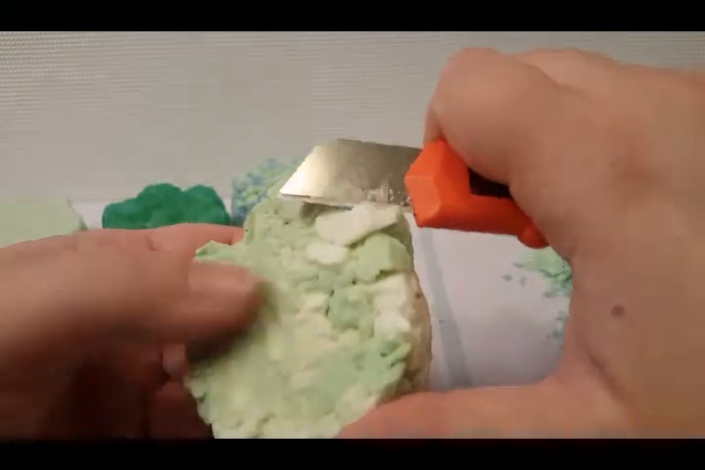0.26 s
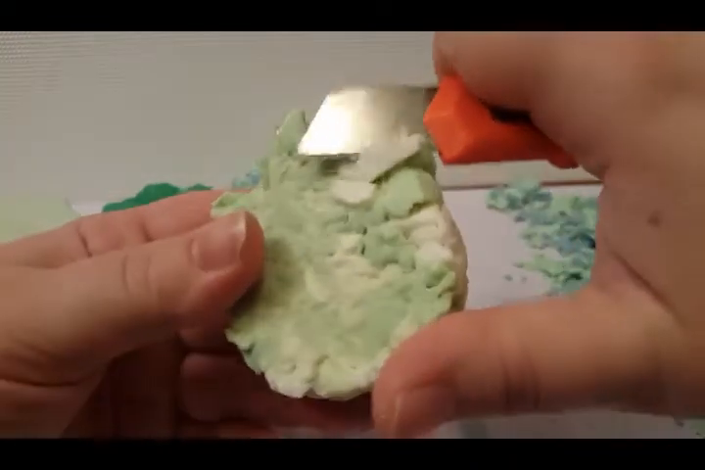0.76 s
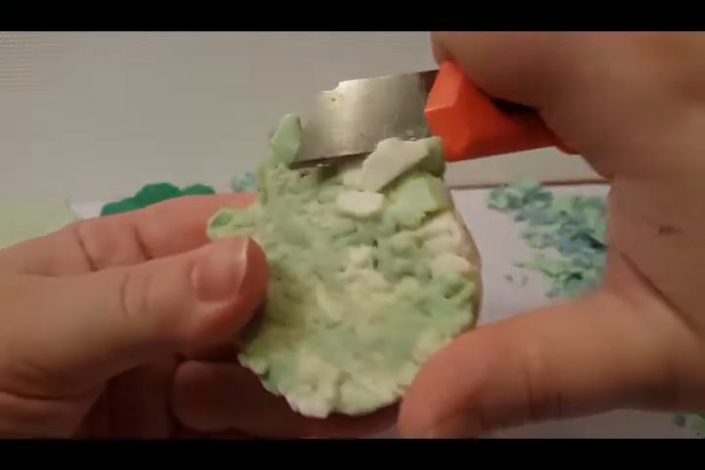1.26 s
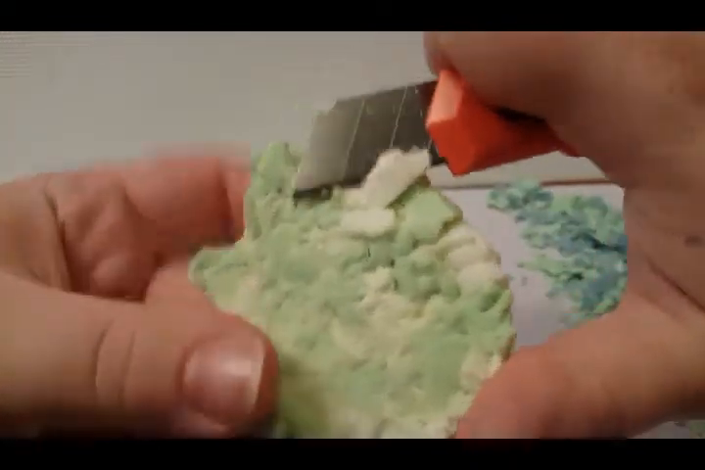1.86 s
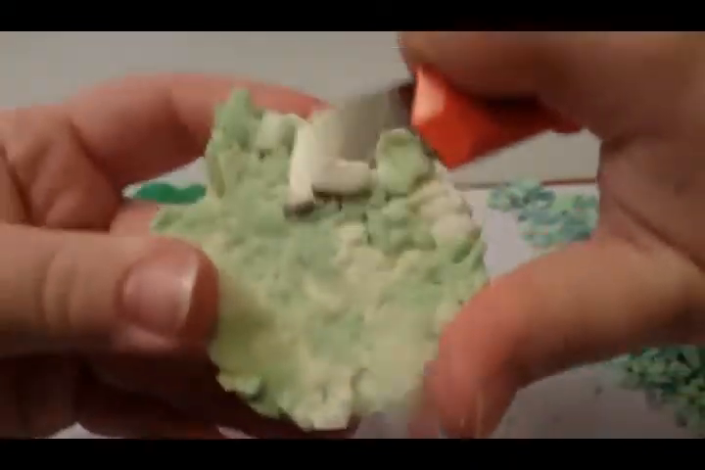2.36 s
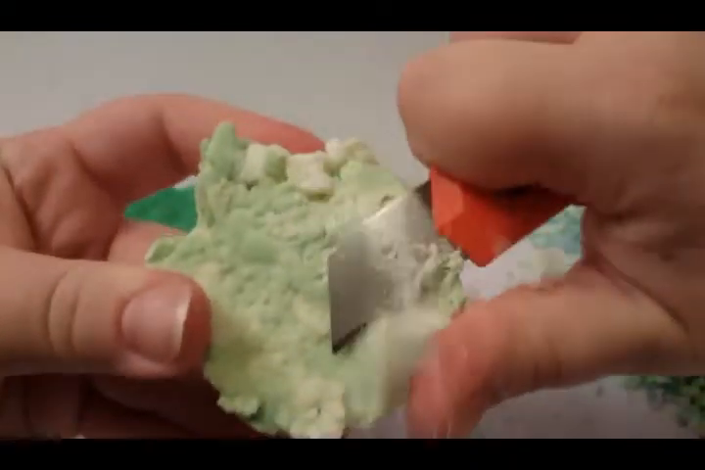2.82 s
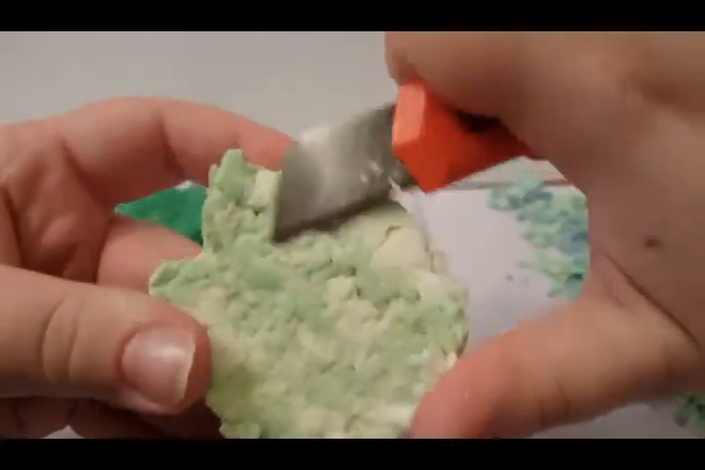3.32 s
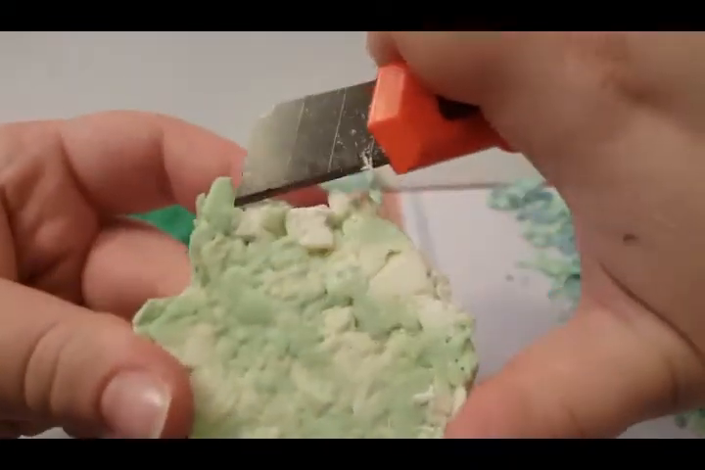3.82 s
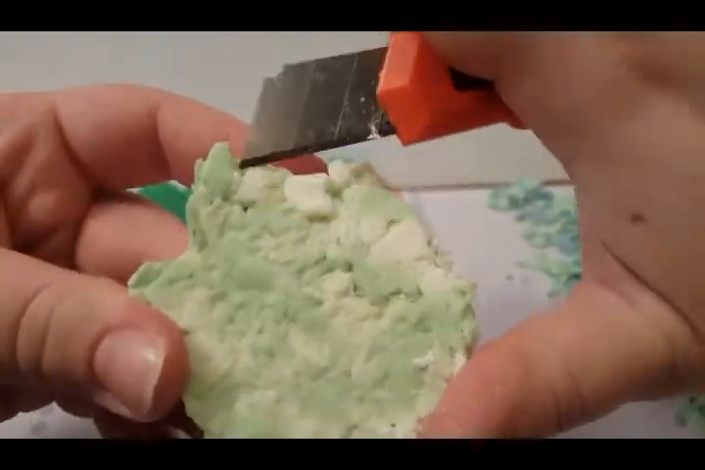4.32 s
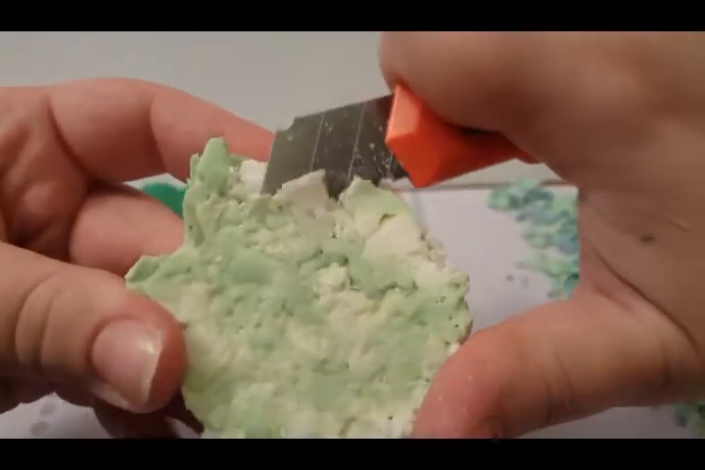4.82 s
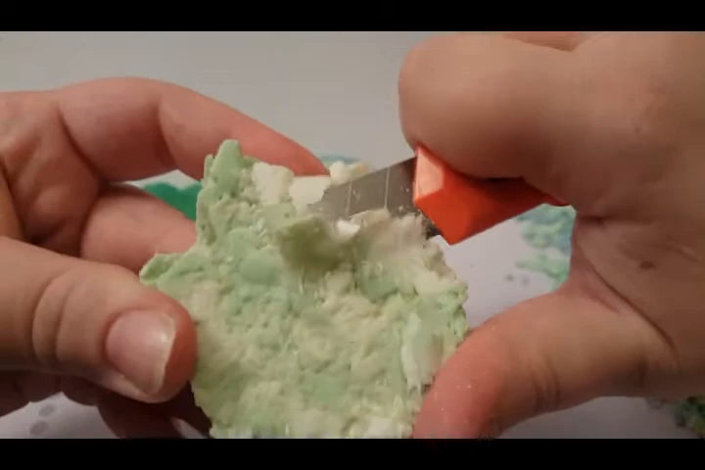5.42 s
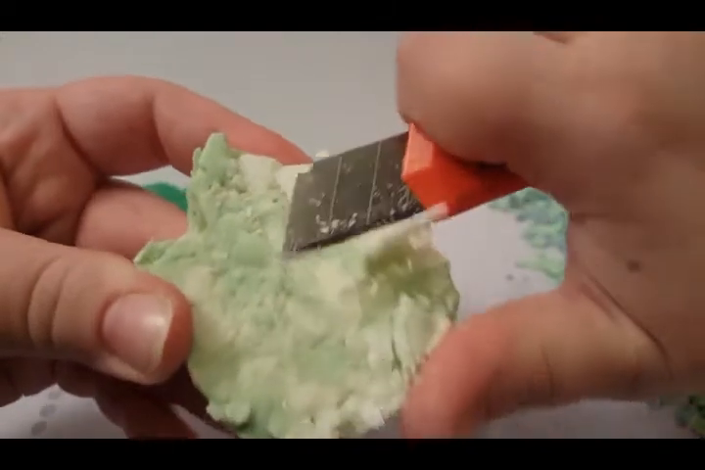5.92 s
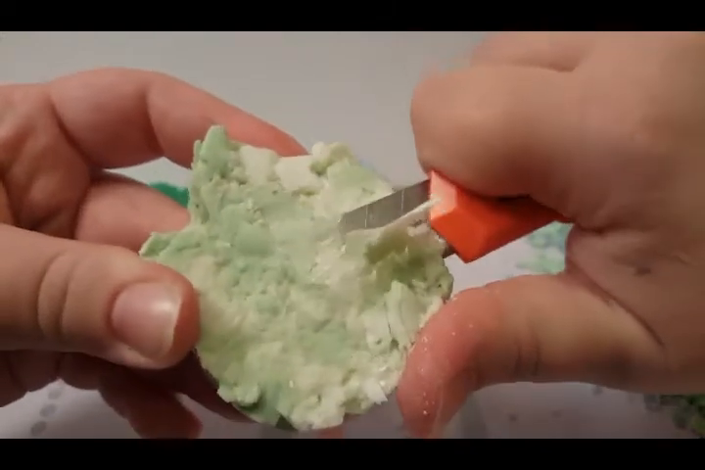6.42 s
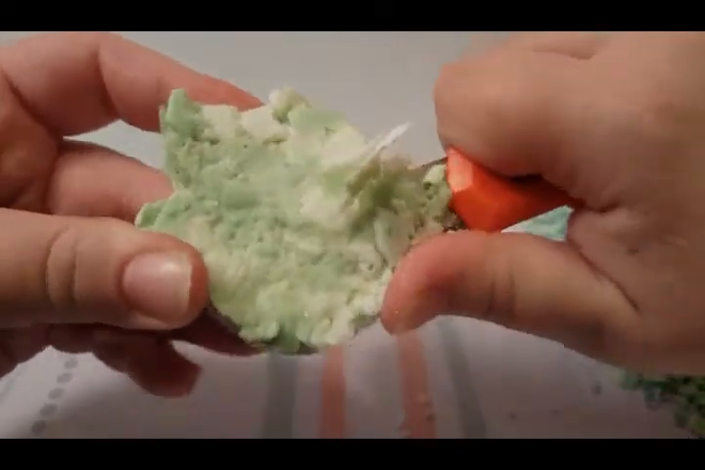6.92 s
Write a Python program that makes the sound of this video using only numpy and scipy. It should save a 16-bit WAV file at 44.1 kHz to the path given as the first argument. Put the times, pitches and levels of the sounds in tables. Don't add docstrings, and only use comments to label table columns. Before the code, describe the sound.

A quiet small room with faint low compressor hum, rumble and soft hiss, heard very close in stereo. At 0.1 s a short gritty scrape and blade jolt, then soft low hand bumps on the table around 0.6 s and a duller blade contact at 0.8 s. After a lull, a sharp brittle crack at 1.7 s is followed by smaller snaps to 1.95 s. Faint ticks and rubs lead to a hard snap at 2.57 s and the loudest, densest crackling from 2.7 to 3.25 s, crumbs ticking off. Ringing blade jolts come at 3.35 s and strongly at 3.8 s, with crunches at 3.65 s and 4.35-4.6 s. Small chips and grain ticks from 5 s build to a crisp cluster at 5.8-5.9 s. Sparse ticks follow, then a hollow plastic knock at 6.8 s and a dull table thump at 7.15 s.

```python
import sys
import numpy as np
from scipy import signal
from scipy.fft import rfft, irfft
from scipy.io import wavfile
from scipy.ndimage import uniform_filter1d

SR = 44100
rng = np.random.default_rng(int(sys.argv[2]) if len(sys.argv) > 2 else 0)


def amplitude_ratio(level_db):
    exponent = np.asarray(level_db, float) / 20
    return 10 ** exponent


def master(y):
    cut = np.clip(np.atleast_2d(y).T, -1, 1)
    pcm = np.round(cut * 32767)
    wavfile.write(sys.argv[1], SR, pcm.astype(np.int16))


N = 316197
TIME_S = np.arange(N) / SR

# freq_hz, density_db
AIR_SPECTRUM = [(30, -12), (130, -1.5), (300, -5), (480, -14), (800, -20), (8000, -31), (10000, -36.5),
                (14500, -31)]
# freq_hz, rms_db
HUM_LINES = [(59, -71), (119, -69), (178, -66), (241, -73), (297, -81.5), (352, -76.5), (411, -72)]
# freq_hz, level_db
TABLE_MODES = [(124.1, 2.5), (153.8, -9), (72.8, -11.5), (191.3, -4.5)]
# start_s, level_db, decay_t60_s, hard_edge_re_bump_db
BUMPS = [(0.585, -43, 0.22, -5), (0.611, -49.5, 0.22, -8), (0.659, -54.5, 0.2, -7), (0.682, -54, 0.16, -10),
         (5.556, -59, 0.65, -27), (5.635, -55.5, 0.48, -4.5), (1.679, -48.5, 0.038, 9),
         (2.81, -51.5, 0.26, 6), (5.88, -49.5, 0.049, 13), (3.101, -58, 0.083, -12.5),
         (4.118, -62.5, 0.16, 4), (7.101, -59, 0.053, 2), (7.149, -38, .3, -7)]
# freq_hz, level_db
EARLIER_RING = [(2000, -60), (2580, -53.5), (3400, -60)]
# freq_hz, level_db, decay_t60_s
HANDLE_MODES = [(1210, -0.5, 0.031), (1276, -9, 0.041), (1665, -5, 0.039), (2500, -13, 0.014),
                (2740, 3.5, 0.021), (2960, 1.5, 0.019), (3120, -4, 0.04), (3520, -4.5, 0.04),
                (4550, -1, 0.024), (7154, -22, 0.011), (7600, -11, 0.011), (8500, -9.5, 0.0027)]
# centre_s, half_length_s, grit_db, blade_ring_re_grit_db
RUBS = [(7.16, 0.01, -60, 7), (2.149, 0.034, -78.5, 8.5), (2.532, 0.003, -66, -10),
        (0.076, 0.0069, -43.5, 5.5), (0.486, 0.036, -68.5, -3.5), (1.539, 0.0035, -59, -7),
        (1.943, 0.019, -58, 3.5), (0.836, 0.018, -59.5, 0), (2.225, 0.006, -60.5, -11),
        (2.406, 0.055, -72, 3.5), (2.468, 0.0059, -61, 3.5), (2.802, 0.038, -47.5, -8),
        (2.908, 0.024, -58, -8), (3.989, 0.011, -68, 4), (4.041, 0.0025, -57.5, 5.5),
        (4.123, 0.012, -59, 5.5), (4.253, 0.012, -66, 7), (4.392, 0.027, -58, 9), (4.426, 0.017, -55, -12),
        (4.704, 0.065, -69.5, -2.5), (4.79, 0.0057, -67.5, 10), (4.836, 0.0047, -64.5, 5.5),
        (4.891, 0.0079, -59, -0.5), (5.137, 0.015, -60, -32), (5.192, 0.031, -67, -7),
        (5.62, 0.026, -66, -5), (5.649, 0.0089, -51, -5), (5.679, 0.0046, -57.5, -3.5),
        (5.836, 0.013, -49, -6.5), (6.708, 0.011, -63, -3), (7.006, 0.0046, -59.5, -15),
        (3.491, 0.003, -59, -14), (7.098, 0.003, -58.5, -2), (4.46, 0.0087, -60, 6),
        (3.022, 0.008, -56, -9), (0.086, 0.0053, -62, -4)]
# start_s, flake_db, ring_re_flake_db, upper_mode_re_flake_db, ring_hz
JOLTS = [(0.0665, -33.5, -0.5, -9, 1930), (0.3227, -63, 3.5, -20, 1910), (0.8301, -43, 5.5, -11.5, 1810),
         (0.931, -65.5, 1, -16, 1993), (2.162, -69, 5, -22, 1830), (2.8157, -40.5, -2, -15, 1830),
         (3.3347, -54, 4, -6, 1910), (3.3377, -42, 7, -4, 1950), (3.349, -56, 12.5, 2, 1900),
         (3.3824, -56, 9.5, -11, 1900), (3.4197, -62, 11, -18, 1890), (3.441, -69.5, 17, -11, 1910),
         (3.7868, -37.5, 5, -21, 2040), (3.7935, -24.5, 4.5, -17, 1975), (3.951, -52, 1, -16, 2000),
         (4.4025, -37.5, 3.5, -17, 1920), (4.4122, -37.5, 2, -21, 1890), (4.4187, -34, 1, -14, 2000),
         (4.432, -48, 6, -7, 2000), (4.4522, -50, 4, -14, 1850), (4.4616, -60, 15, -15, 1910),
         (4.4686, -40, 3.5, -18, 1900), (4.5664, -54.5, 14.5, -8, 2020), (6.7566, -64.5, 2.5, -20, 1730),
         (7.148, -52.5, 15.5, -6.5, 2160), (7.16, -51, 12, -6, 1395), (3.8, -46.5, 5.5, -4, 1890),
         (3.81, -53.5, 12, -6, 2080), (3.826, -58, 5, -3, 1940), (4.83, -71, 9, 0, 1860),
         (4.233, -78, 10, -2, 1800), (3.29, -71, 12, -9, 1850), (3.996, -66, 6, -7, 1870),
         (4.045, -64, 9, -6, 1930), (4.2516, -61, 9.5, -8.5, 1930), (4.268, -74, 15.5, -10, 1860),
         (4.37, -58, 11.5, -2, 1840), (4.385, -59, 8, -1, 1880), (4.6738, -73.5, 9, -5, 2100),
         (4.731, -74, 10, -9, 1950), (4.786, -69, 2, -1, 1970)]
# time_s, flake_pitch_hz, left_minus_right_db
WORK_PLACE = [(0.15, 3000, -0.5), (1.68, 4560, 1), (1.79, 3830, -4.5), (1.95, 3220, -12.5), (2.57, 4460, 3),
              (2.67, 3620, 7), (2.77, 4110, -2.5), (2.92, 4100, 4), (3.01, 4930, 1.5), (3.1, 4800, 4.5),
              (3.13, 4200, 2), (3.66, 4560, 5), (4.34, 4330, 1.5), (5.05, 4280, 1.5), (5.42, 4500, 3),
              (5.83, 4580, -1), (5.87, 4580, 2.5), (6.75, 4750, 1.5)]
# blade_ring_db, bright_snap_db, bar_thud_db
BREAKS = [(1.68, -25, -9.5, -4.5, -10.5), (1.7374, -41, -6.5, -2.5, -3), (1.787, -37.5, -6, -41, -16.5),
          (1.8364, -37.5, -16, -39, -20), (2.569, -21, -6, -20.5, -26.5), (2.6714, -38, 5.5, -24, -5),
          (2.6769, -30, -16, -22, -25), (2.7549, -35.5, -6, -44.5, -14), (2.7624, -19.5, -17, -20.5, -26),
          (2.7667, -19, -16, -22, -23), (2.8807, -35.5, -19, -16, -26), (3.0115, -32, -27, -12, -30),
          (3.04, -28, -8, -8, -11.5), (3.0522, -36, -3.5, -3, -21), (3.0954, -22.5, -11, -40, -20),
          (3.0997, -24, -10.5, -27, -31), (3.1039, -27.5, -27, -29, -46), (3.1272, -26, -7.5, -27, -22),
          (3.214, -39, -7.5, -3, -11.5), (3.6563, -29, -23.5, -48, -32), (3.6598, -35.5, -14.5, -30, -15.5),
          (3.7331, -29, -15.5, -9.5, -35), (4.3439, -33, -18.5, -12.5, -26), (5.423, -39, -14.5, -23, -18),
          (5.4531, -38, -15, -10.5, -19), (5.8233, -32.5, -20.5, -18.5, -23), (5.828, -36.5, -3, -23, -9),
          (5.8534, -35, -19, -5, -19), (5.8687, -35, -14, -8, -19), (5.8806, -22.5, -10, -5.5, -15.5),
          (3.0128, -37, -26, -5, -21), (3.097, -31, -23, -32, -22), (3.1073, -43, -20, -23, -28),
          (3.114, -44, -20, -24, -29), (2.57, -33, 3.5, -25, -30)]
# start_s,
# level_db, blade_ring_re_flake_db
CHIPS = [(0.142, -51.5, -1.5), (0.171, -48.5, -3.5), (1.9032, -50, -13), (1.928, -49, -12),
         (1.9429, -45.5, -37), (2.744, -50, -8), (2.7943, -53, 8), (2.8244, -37, -8), (2.8396, -41, -13),
         (2.873, -47, -18), (2.8845, -43, -14), (2.919, -40, -30), (2.931, -45.5, -10.5),
         (3.0005, -38, -10), (3.007, -37, -30), (3.0787, -45, -25), (3.1765, -51, 0.5), (3.2459, -45.5, -9),
         (3.6975, -45.5, -23.5), (4.3352, -46, -20), (1.689, -40.5, -12), (1.892, -57, -12),
         (1.958, -57, 2), (2.448, -58, -9.5), (2.375, -64.5, 4), (2.405, -64.5, 5.5), (7.151, -55, 19),
         (5.514, -57, -16), (5.605, -58.5, -23), (5.937, -57, -22), (5.437, -54.5, -18), (4.598, -40, -7.5),
         (5.0524, -46.5, -13), (5.0887, -43.5, -10.5), (5.133, -40.5, -27), (5.186, -45.5, -11),
         (5.42, -44.5, -8), (5.7978, -42, -13), (5.8307, -34, -18), (5.858, -39, -16), (6.7425, -45.5, -16)]
# start_s, level_db, grain_pitch_hz, blade_ring_re_grain_db
TICKS = [(0.487, -56.5, 5330, -10), (2.302, -59.5, 6240, -12), (2.3173, -63.5, 3930, 7),
         (2.3563, -52, 5400, -5), (2.418, -60.5, 4500, 1), (2.435, -54.5, 4050, -7),
         (2.9878, -52.5, 4430, -7), (3.259, -49.5, 4280, -9), (3.287, -53.5, 2800, -2.5),
         (3.721, -58, 5200, -12), (3.5894, -55, 5250, -27), (3.6045, -52.5, 5100, -27),
         (4.746, -51, 6300, -7.5), (4.956, -57.5, 5470, -13), (5.06, -47.5, 5100, -21),
         (5.127, -51.5, 4400, -9), (5.248, -53, 4300, -10), (5.328, -52, 5060, -12),
         (5.3645, -50, 5100, -23), (5.3787, -55, 4830, -14.5), (5.526, -50.5, 4900, -11.5),
         (5.592, -56, 4740, -13), (5.8056, -46, 5160, -17.5), (6.0006, -47, 5280, -20),
         (6.1812, -54.5, 3740, -3), (6.524, -60, 5160, -14), (6.539, -51.5, 4900, -13),
         (6.603, -53, 5000, -24.5), (6.8617, -53.5, 5100, -10), (7.0806, -52.5, 2670, -10),
         (2.651, -58, 6800, -23), (2.75, -56, 5800, -20), (2.8945, -50, 3200, -15), (3.403, -61, 4630, -14),
         (3.472, -57, 4270, -18), (4.2163, -64.5, 6200, -6), (4.731, -60, 5560, -15),
         (4.9397, -62.5, 6500, -13), (5.0175, -64.5, 5330, -18), (5.096, -56, 5000, -14),
         (5.14, -50, 4600, -12), (5.177, -58, 4900, -15.5), (5.206, -64, 4570, -18),
         (5.2328, -59, 4800, -14), (6.059, -62, 4540, -16), (6.752, -69, 4350, -20),
         (3.672, -59, 4600, -18), (2.1974, -69, 2820, 0), (6.2203, -63, 4840, -8), (4.3318, -52, 4600, -15)]
# freq_hz, left_db, right_db
PORT_RESPONSE = [(500, -5, -0.5), (2000, -3, 1.5), (5100, -0.5, -1.5), (8400, -13, -1.5),
                 (9500, -13.5, -7.5), (12900, -12, -2)]

AIR_DB = -64.5
LEFT_LAG_S = 0.00014
WALL_DELAY_S, WALL_DB = 0.0086, -17.5
ROOM_T60_S, ROOM_DB, TAIL_UNEVEN_DB = 0.3, -17.5, 3
JOLT_ROOM_DB, HANDLE_ROOM_DB = -12, -11
HANDLE_S, HANDLE_DB = 6.7812, -33.5
HISS_DB, HISS_SLOPE_DB_PER_DB = -8, 0.028
JOLT_BRIGHT_DB, JOLT_BRIGHT_SLOPE_DB_PER_DB = -10, 0.48
CHIP_BRIGHT_DB, TICK_BRIGHT_DB = -14.5, -13.5
SMALL_BRIGHT_DB_PER_OCTAVE = 26.5
SMALL_BAR_DB = -9
FLAKE_WIDTH, GRAIN_WIDTH = 1.17, 0.94
FLAKE_FADE_S, GRAIN_FADE_S = 0.0018, 0.0022


def band(x, lo_hz, hi_hz, order=2):
    sos = signal.butter(order, [lo_hz, hi_hz], "bandpass", fs=SR, output="sos")
    return signal.sosfilt(sos, x)


def unit(x):
    return x / np.sqrt(np.mean(x ** 2))


def noise_band(count, lo_hz, hi_hz, order=2):
    return unit(band(rng.standard_normal(count), lo_hz, hi_hz, order))


def walk(rate_hz):
    hold = int(SR / rate_hz)
    steps = np.repeat(rng.standard_normal(N // hold + 1), hold)
    slewed = uniform_filter1d(uniform_filter1d(steps, hold), hold)
    return unit(slewed[:N])


def add(out, start_s, x):
    i = int(start_s * SR)
    out[:, i:i + x.shape[1]] += x[:, :N - i]


def even_out(x, bins=36):
    spec = rfft(x)
    return spec / np.sqrt(uniform_filter1d(np.abs(spec) ** 2, size=bins))


def burst(start_s, db, hz, width_hz, pan_db, rise, fade, apart, order=2, size=2048):
    start_s, db, hz, width_hz, pan_db = np.broadcast_arrays(start_s, db, hz, width_hz, pan_db)
    t = np.arange(size) / SR
    f = np.fft.rfftfreq(size, 1 / SR) + 1
    envelope = (1 - np.exp(-t / rise)) * np.exp(-t / np.reshape(fade, (-1, 1)))
    tears = rng.standard_normal((2, len(start_s) if start_s.ndim else 1, size)) * envelope
    shared, own = even_out(tears[0]), even_out(tears[1])
    resonance = (1 + 1j * (f - hz[:, None] ** 2 / f) / width_hz[:, None]) ** -order
    left = (shared + apart * own) * np.exp(-2j * np.pi * f * LEFT_LAG_S)
    right = shared - apart * own
    heard = irfft(np.array([left, right]) * resonance, size) * (t < 0.8 * size / SR)
    heard /= np.sqrt((heard ** 2).sum(axis=2, keepdims=True) / 176)
    out = np.zeros((2, N))
    for k in range(len(start_s)):
        port_db = db[k] + np.array([[pan_db[k]], [-pan_db[k]]]) / 2
        add(out, start_s[k], heard[:, k] * amplitude_ratio(port_db))
    return out


def air():
    hz = np.maximum(np.fft.rfftfreq(N, 1 / SR), 1)
    knot_hz, knot_db = np.transpose(AIR_SPECTRUM)
    colour = amplitude_ratio(np.interp(np.log(hz), np.log(knot_hz), knot_db, left=-30))
    mid, side = rfft(rng.standard_normal((2, N)))
    apart = np.clip(hz / 600, 0.42, 1)
    ports_spec = colour * (mid + apart * side * np.array([[1], [-1]]))
    return amplitude_ratio(AIR_DB) * unit(irfft(ports_spec, N))


def hum():
    skew_rad = np.array([[0.32], [-0.32]])
    out = np.zeros((2, N))
    for hz, db in HUM_LINES:
        level = amplitude_ratio(db + 2.1 * walk(6)) * np.sqrt(2)
        out += level * np.sin(2 * np.pi * hz * TIME_S + 0.93 * walk(8) + skew_rad)
    return out * amplitude_ratio(np.array([[-0.5], [0.5]]))


def room(dry):
    t = np.arange(SR // 2) / SR
    count = len(t)
    late_s = np.maximum(t - WALL_DELAY_S, 0)
    scatter = rng.standard_normal((2, count)) * (t > WALL_DELAY_S)
    wall = band(scatter * np.exp(-late_s / 0.0022), 400, 9000)
    decay = (t > 0.003) * np.exp(-np.log(1000) * t / ROOM_T60_S)
    dense = even_out(rng.standard_normal((2, count)) * decay, bins=24)
    tail = irfft(dense, count) * (t > 0.003) * (t < 0.4)
    tail = band(tail * amplitude_ratio(TAIL_UNEVEN_DB * walk(350)[:count]), 490, 7400)
    echo = np.zeros((2, count))
    for db, x in ((WALL_DB, wall), (ROOM_DB, tail)):
        echo += amplitude_ratio(db) * x / np.sqrt((x ** 2).sum(axis=1, keepdims=True))
    return signal.fftconvolve(dry, echo, axes=1)[:, :N]


def bumps():
    out = np.zeros((2, N))
    t = np.arange(SR // 2) / SR
    count = len(t)
    hz, mode_db = np.transpose(TABLE_MODES)
    for start_s, db, t60_s, edge_db in BUMPS:
        level_z, pitch_z = rng.standard_normal((2, len(hz)))
        phases = 2 * np.pi * np.outer(hz * (1 + 0.02 * pitch_z), t)
        body = amplitude_ratio(mode_db + 2.5 * level_z) @ np.sin(phases)
        body = body + 0.5 * noise_band(count, 220, 488, order=3)
        body = body + 0.56 * noise_band(count, 95, 200)
        edge = noise_band(count, 430, 880, order=3) * np.exp(-t / 0.02)
        edge = edge + 0.13 * noise_band(count, 900, 2300) * np.exp(-t / 0.035)
        fade = (1 - np.exp(-t / 0.0016)) * np.exp(-np.log(1000) * t / t60_s)
        bump = amplitude_ratio(db) * fade * (body + amplitude_ratio(edge_db) * edge)
        add(out, start_s, bump * amplitude_ratio(np.array([[-0.5], [0.5]])))
    return out


def earlier():
    hz, db = np.transpose(EARLIER_RING)
    return burst(0, db, hz, 0.28 * hz, -2.1, rise=0.0005, fade=0.047, apart=0.96, size=4096)


def handle():
    hz, mode_db, t60_s = np.transpose(HANDLE_MODES)
    db = HANDLE_DB + mode_db
    width_hz = np.log(1000) / np.pi / t60_s
    knock = burst(HANDLE_S, db, hz, width_hz, -5.5, rise=0.00073, fade=0.0015, apart=0.36, order=1)
    rattle = burst(HANDLE_S + 0.0044, db - 16, hz, 3 * width_hz, -2.0,
                   rise=0.003, fade=0.014, apart=0.55, order=1, size=4096)
    buzz = burst(HANDLE_S + 0.01, db - 19, hz, 3.3 * width_hz, -1.5,
                 rise=0.008, fade=0.04, apart=0.8, size=8192)
    return band(knock + rattle + buzz, 710, 16000, order=3)


def rubs(density=0.049, scatter_db=4.5):
    size_db = scatter_db * np.minimum(rng.exponential(size=(2, N)), 3)
    slips = (rng.random((2, N)) < density) * rng.standard_normal((2, N)) * amplitude_ratio(size_db)
    shared = np.array([np.roll(slips[0], int(LEFT_LAG_S * SR)), slips[0]])
    slips = shared + 0.7 * np.array([slips[1], -slips[1]])
    grit = unit(band(slips, 1800, 8200))
    blade = unit(band(slips, 1780, 2040) + 0.65 * band(slips, 900, 5400))
    hiss = unit(band(slips, 8100, 12000))
    push = np.zeros((3, N))
    for centre_s, half_s, db, blade_db in RUBS:
        hiss_db = HISS_DB + HISS_SLOPE_DB_PER_DB * (db + 66)
        swell = np.exp(-0.58 * ((TIME_S - centre_s) / max(half_s, 0.003)) ** 2)
        push += amplitude_ratio(db + np.array([[0], [blade_db], [hiss_db]])) * swell
    return push[0] * grit + push[1] * blade + push[2] * hiss


def crumbs(count=150):
    parent, wait, size, pitch = rng.random((count, 4)).T
    start_s, db = np.array(BREAKS)[(parent * len(BREAKS)).astype(int), :2].T
    late_s = 0.006 - 0.03 * np.log(wait)
    hz = 2800 * 2.2 ** pitch
    crumb_db = -61 + 0.6 * (db + 27) - 120 * late_s + 15 * size
    return burst(start_s + late_s, crumb_db, hz, 0.3 * hz, -1.5, rise=0.00026, fade=0.0016, apart=0.45)


def jolts():
    s, db, ring_re_db, upper_db, ring_hz = np.transpose(JOLTS)
    ring_db = db + ring_re_db
    bright_db = db + JOLT_BRIGHT_DB + JOLT_BRIGHT_SLOPE_DB_PER_DB * (db + 50)
    ring = burst(s, ring_db, ring_hz, 330, -0.031, rise=0.0057, fade=0.0013, apart=0.26)
    upper = burst(s, db + upper_db, 2940, 420, -20, rise=0.0024, fade=0.0057, apart=0.89)
    crunch = burst(s + 0.0014, db - 1, 3670, 4600, 2.2, rise=0.0018, fade=0.0027, apart=1, order=3)
    bright = burst(s + 0.00045, bright_db, 5800, 8200, -1, rise=0.00055, fade=0.0062, apart=0.088)
    bar = burst(s, ring_db - 14, 640, 2700, -0.4, rise=0.00024, fade=0.0061, apart=0.21)
    shiver = burst(s + 0.006, ring_db - 15.5, ring_hz, 520, -0.5,
                   rise=0.0037, fade=0.027, apart=0.8, size=8192)
    return ring + upper + crunch + bright + bar + shiver


def snaps():
    breaks, chips, ticks = np.array(BREAKS), np.array(CHIPS), np.array(TICKS)
    s, db = np.concatenate([breaks[:, :2], chips[:, :2], ticks[:, :2]]).T
    place_s, place_hz, place_pan_db = np.transpose(WORK_PLACE)
    hz = np.interp(s, place_s, place_hz)
    pan_db = np.interp(s, place_s, place_pan_db)
    hz[-len(ticks):] = ticks[:, 2]
    counts = [len(breaks) + len(chips), len(ticks)]
    width_hz = hz * np.repeat([FLAKE_WIDTH, GRAIN_WIDTH], counts)
    fade_s = np.repeat([FLAKE_FADE_S, GRAIN_FADE_S], counts)
    blade_db = np.concatenate([breaks[:, 2], chips[:, 2], ticks[:, 3]])
    small_db = np.repeat([CHIP_BRIGHT_DB, TICK_BRIGHT_DB], [len(chips), len(ticks)])
    small_db = small_db + SMALL_BRIGHT_DB_PER_OCTAVE * np.log2(hz[len(breaks):] / 4500)
    bright_db = np.concatenate([breaks[:, 3], small_db])
    bar_db = np.concatenate([breaks[:, 4], blade_db[len(breaks):] + SMALL_BAR_DB])
    flake = burst(s, db, hz, width_hz, pan_db, rise=0.00005, fade=fade_s, apart=0.76, order=4)
    bright = burst(s, db + bright_db - 0.5, 11500, 11000, pan_db, rise=0.00005, fade=0.00061, apart=0.31)
    blade = burst(s, db + blade_db, 1910, 2800, pan_db, rise=0.0001, fade=0.0024, apart=1)
    bar = burst(s, db + bar_db, 490, 1000, -2.2, rise=0.0011, fade=0.0048, apart=0.77)
    return flake + bright + blade + bar


def ports(x):
    hz, *port_db = np.transpose(PORT_RESPONSE)
    log_hz = np.log(np.fft.rfftfreq(N, 1 / SR) + 1)
    gain_db = np.array([np.interp(log_hz, np.log(hz), db) for db in port_db])
    return irfft(rfft(x) * amplitude_ratio(gain_db), N)


def scene():
    soap = snaps() + rubs() + crumbs() + earlier()
    blade, grip = jolts(), handle()
    echoes = room(soap + amplitude_ratio(JOLT_ROOM_DB) * blade + amplitude_ratio(HANDLE_ROOM_DB) * grip)
    return ports(soap + blade + grip + echoes) + bumps() + hum() + air()


def starve_treble(x, under_db=-16, scatter_db=17, size=512):
    hz, _, spec = signal.stft(x, SR, nperseg=size)

    def band_rms(part):
        return np.sqrt(np.mean(np.abs(spec[:, part]) ** 2, axis=1))

    mids = band_rms((hz > 1700) & (hz < 7300))
    attack = mids > amplitude_ratio(5) * uniform_filter1d(mids, size=9)
    for lo_hz in np.arange(8800, 14700, 350):
        part = (hz >= lo_hz) & (hz < lo_hz + 350)
        wander = uniform_filter1d(rng.standard_normal(mids.shape), size=10)
        keep = band_rms(part) > mids * amplitude_ratio(under_db + scatter_db * wander)
        spec[:, part] *= np.where(keep | attack, 1, 0.05)[:, None]
    return signal.istft(spec, SR, nperseg=size)[1][:, :N]


def band_limit(x):
    return signal.sosfilt(signal.butter(12, 16000, fs=SR, output="sos"), x)


def record(dry):
    top_cut = signal.ellip(6, 0.3, 24, 14600, fs=SR, output="sos")
    mix = starve_treble(signal.sosfilt(top_cut, dry)) - 0.0005
    return band_limit(mix)


dry = scene()
out = record(dry)
master(out)
```